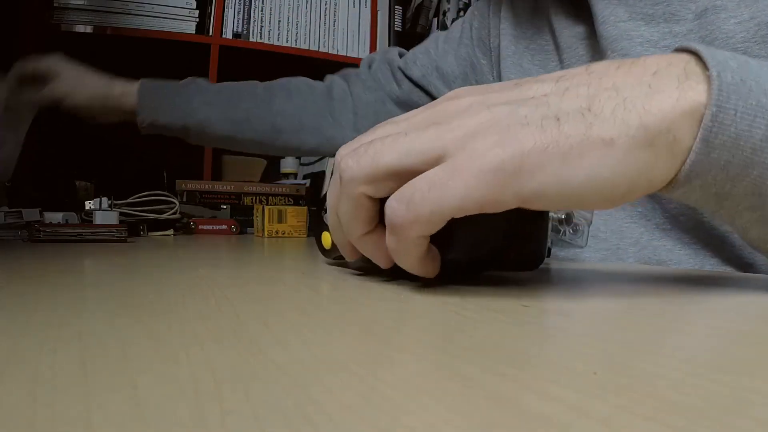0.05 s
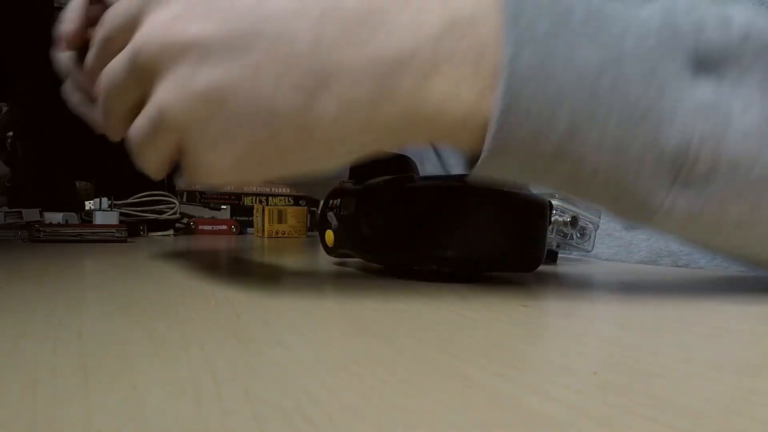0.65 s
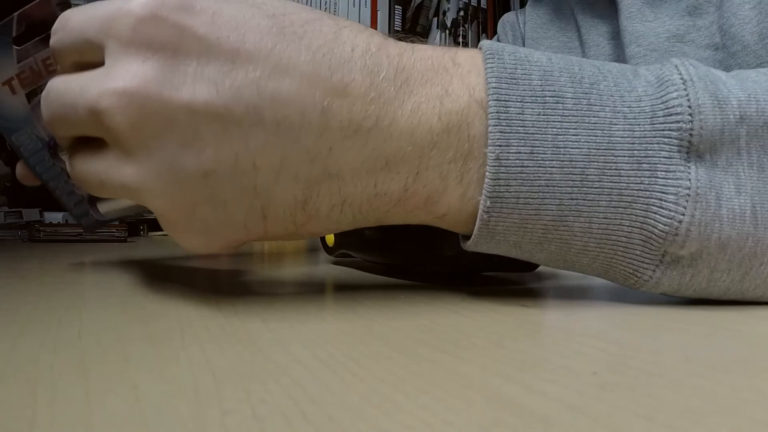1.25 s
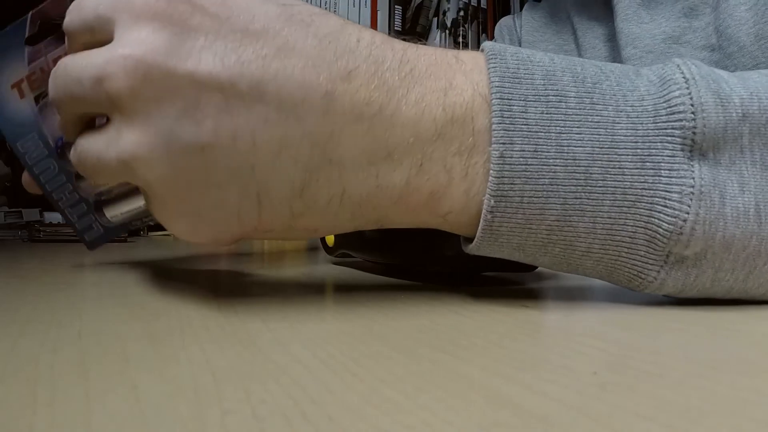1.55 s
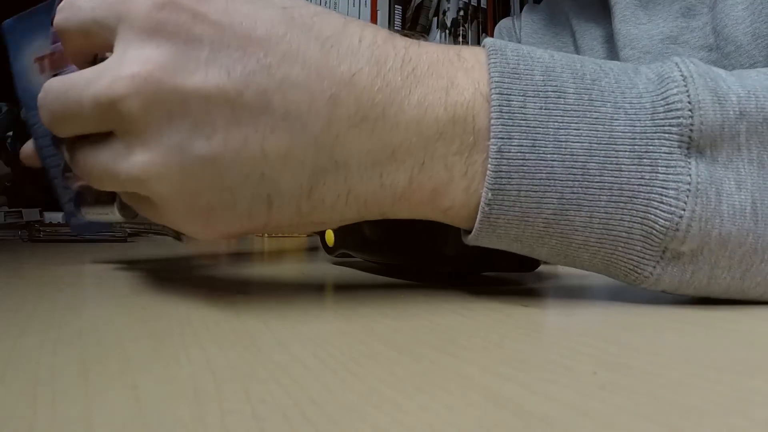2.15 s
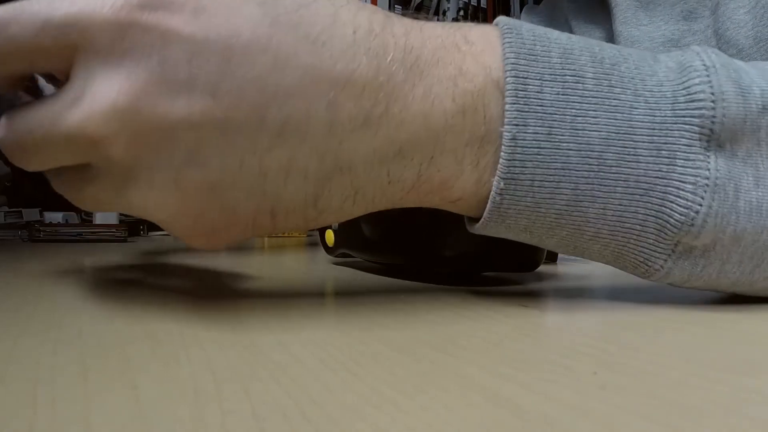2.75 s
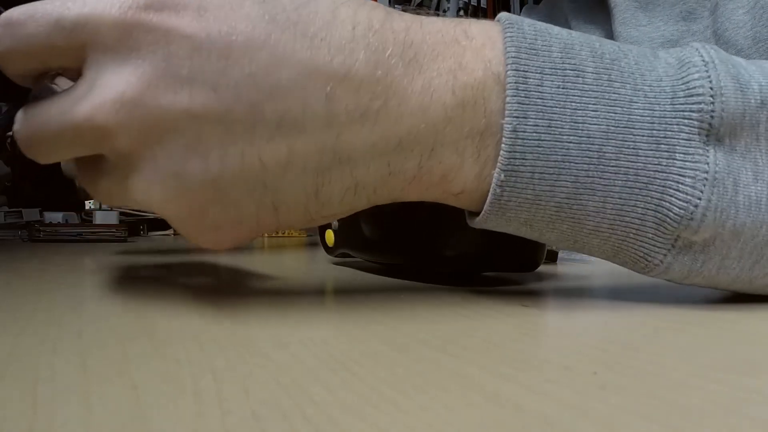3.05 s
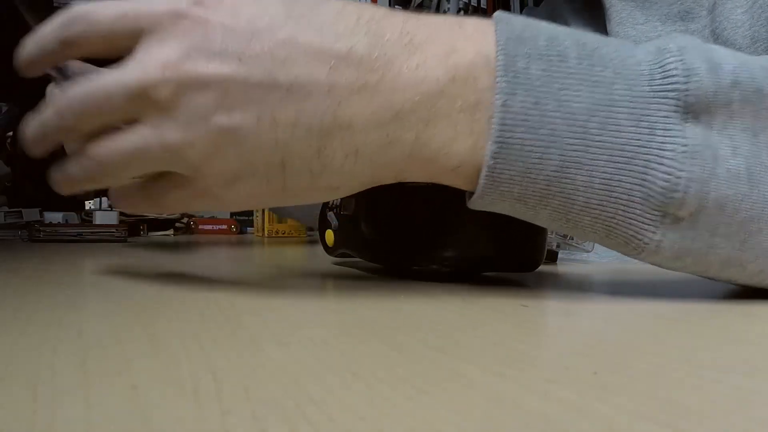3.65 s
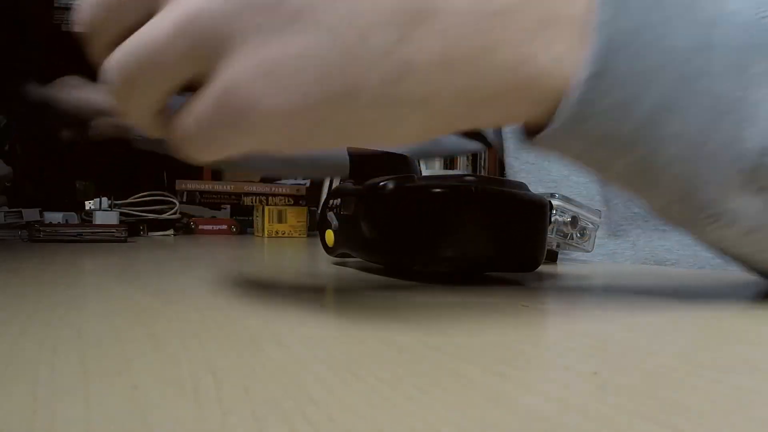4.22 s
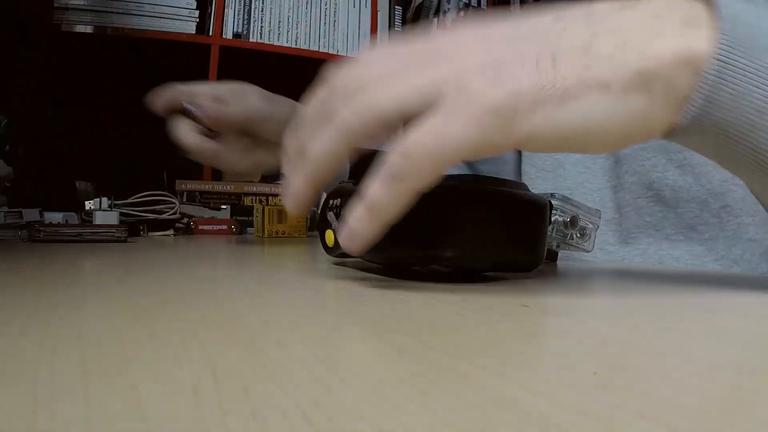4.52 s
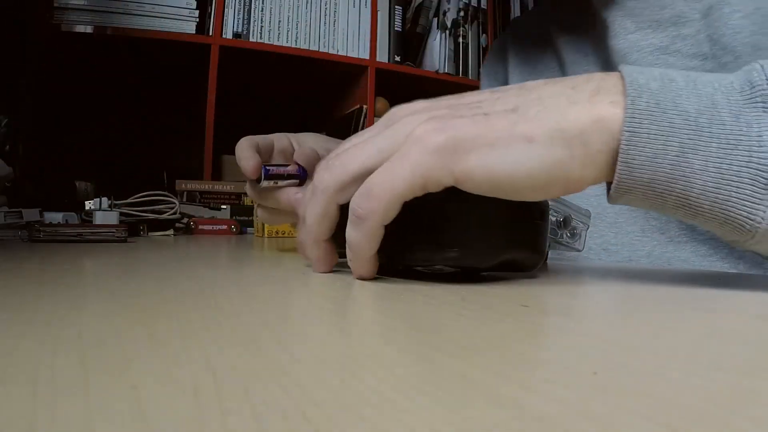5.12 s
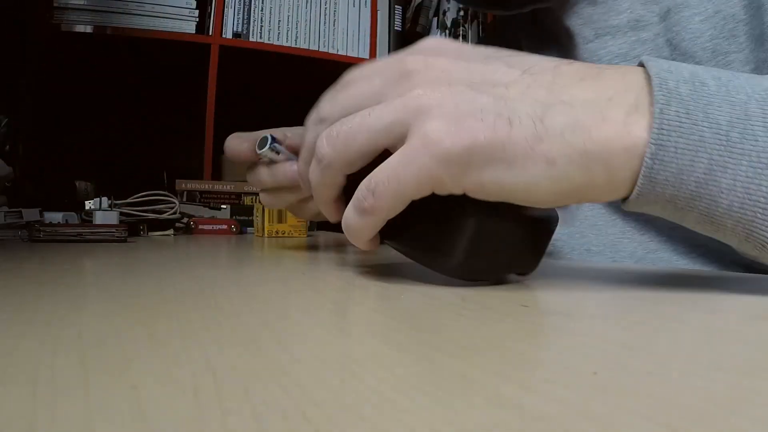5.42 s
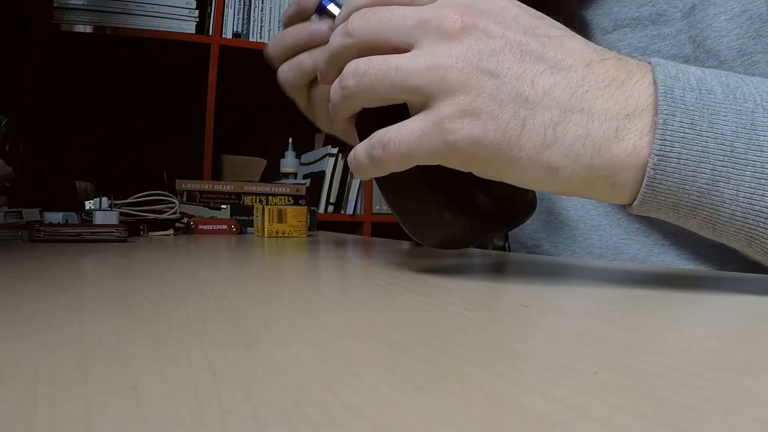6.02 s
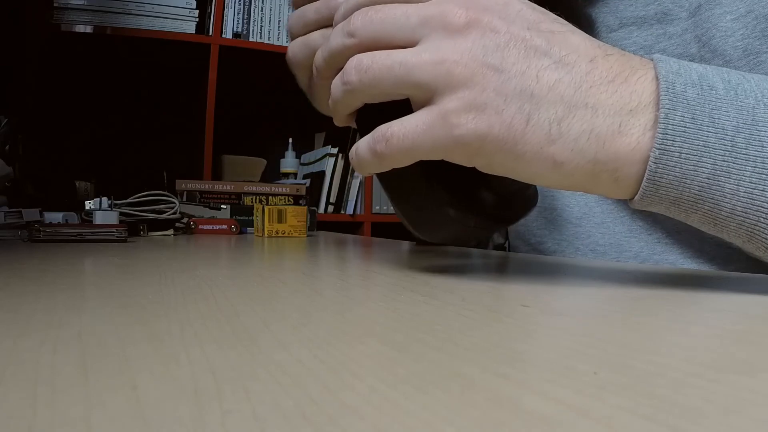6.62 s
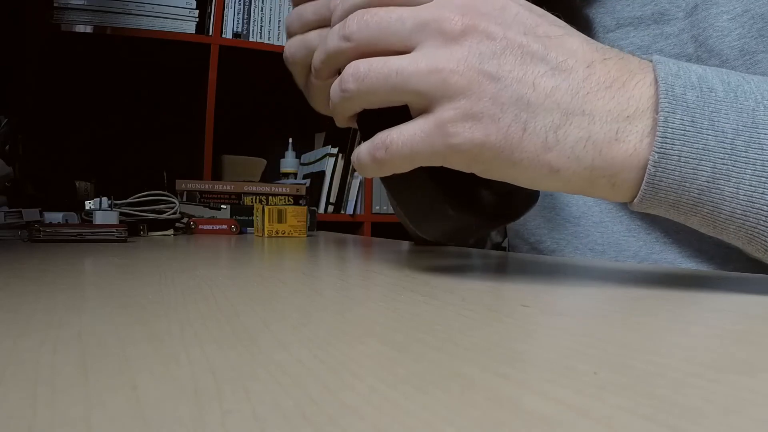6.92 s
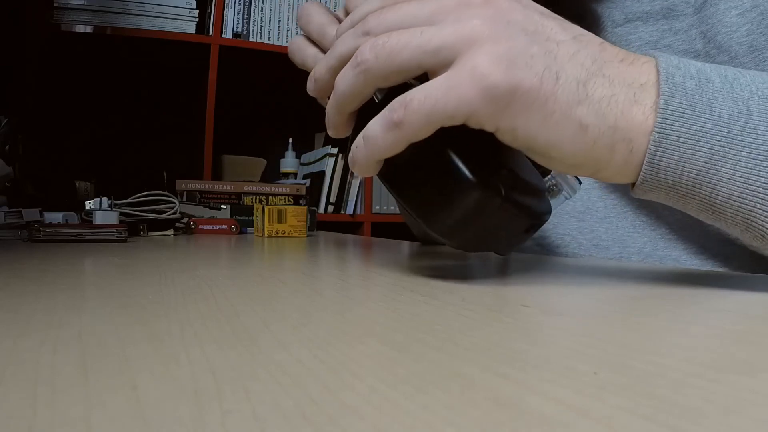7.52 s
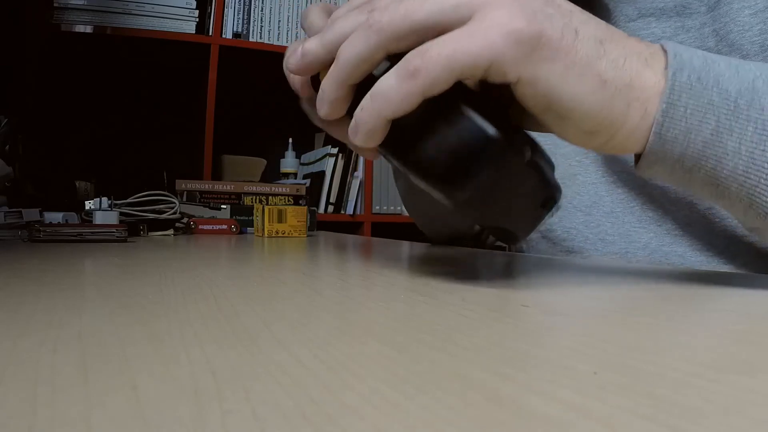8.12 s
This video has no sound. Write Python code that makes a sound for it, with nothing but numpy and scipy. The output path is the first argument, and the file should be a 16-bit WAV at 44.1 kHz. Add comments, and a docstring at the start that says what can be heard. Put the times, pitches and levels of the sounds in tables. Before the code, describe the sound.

A small film camera lands on a wooden desk with two dull knocks and a slight drag in the first 0.3 seconds. From about 0.5 to 3.4 seconds fingers softly rub a card carton, with scattered ticks and tearing snaps, the strongest at 1.6, and a short squeak at 2.1. At 3.4 a plastic canister lid pops sharply, the loudest sound, followed by faint finger rubs. At 4.2 tossed packaging lands in a quick, fairly loud clatter. The camera scrapes across the wood from 4.7 to 5.3, ending in a firm knock. After a quiet stretch and a faint slide near 7, the film cartridge clicks and rattles into the plastic chamber from 7.2 to 7.8, with soft low thuds from the desk and a last tiny tick at 8. Everything is close, with short small-room reverberation over a faint, steady rumble and hiss.

```python
"""A film camera knocks and drags on a wooden desk, close by, over the low rumble of a small room.
Fingers rub a film carton until the card snaps and tears; the canister lid pops, the packaging tumbles
aside, the camera is slid and tilted, and the cartridge clicks into its chamber. Each impact excites
the damped modes of the struck object, each rub is a train of tiny stick-slip pulses, and the room
answers both with a short reverberation."""
import sys
import numpy as np
from scipy import signal
from scipy.fft import rfft, irfft
from scipy.io import wavfile

SR = 44100
rng = np.random.default_rng(int(sys.argv[2]) if len(sys.argv) > 2 else 0)


def unload_wav(signal):
    """Save mono or channel-first audio to the path in sys.argv[1] as 16-bit WAV at rate SR, clipped to [-1, 1]."""
    wavfile.write(
        sys.argv[1],
        SR,
        np.round(np.clip(np.atleast_2d(signal).T, -1, 1) * 32767).astype(np.int16),
    )


N = 364266


def amp(db):
    """Amplitude ratio of a level in decibels."""
    return 10 ** (np.asarray(db) / 20)


def unit(x):
    """Normalisation to an energy of one."""
    return x / np.sqrt(np.sum(x ** 2))


def fade(t, t60):
    """Exponential damping, 60 dB down at t60."""
    return np.exp(-np.log(1000) * t / t60)


def add(track, start_s, x):
    """Superposition: x joins the track at start_s."""
    i = max(int(start_s * SR), 0)
    track[i:i + len(x)] += x[:N - i]


def colour(x, spectrum, size=4096):
    """Minimum-phase filtering to a spectrum of (frequency_hz, level_db) points."""
    hz, db = np.transpose(spectrum)
    bin_hz = np.maximum(np.arange(size // 2 + 1) * SR / size, 1)
    gain = amp(np.interp(np.log(bin_hz), np.log(hz), db))
    cepstrum = irfft(np.log(gain))
    cepstrum[1:size // 2] *= 2  # folding onto positive time makes the filter causal
    cepstrum[size // 2 + 1:] = 0
    return signal.fftconvolve(x, irfft(np.exp(rfft(cepstrum))))[:len(x)]


def band(x, hz, ratio):
    """Band-pass filtering from hz / ratio to hz * ratio."""
    edges = [hz / ratio, min(hz * ratio, SR / 2 - 1000)]
    return signal.sosfilt(signal.butter(2, edges, "band", fs=SR, output="sos"), x)


def impacts(events, modes, crack_spectrum, *, contact_s, focus_db, crack_t60, buzz_db, buzz_t60,
            part_db, part_t60, tilt_db, tilt_per_crack):
    """Modal ringing: a blow favours modes near its pitch, under a noisy crack and loose parts' buzz."""
    out, t = np.zeros(N), np.arange(SR // 6) / SR
    mode_hz, mode_db, t60 = np.transpose(modes)[:, :, None]
    polarity = (-1) ** np.arange(len(modes))[:, None]  # neighbouring modes start in opposite directions
    contact = 1 - np.exp(-(t / contact_s) ** 2)  # surfaces meet and scuff over a moment
    noise_envelope = contact * (fade(t, crack_t60) + amp(buzz_db) * fade(t, buzz_t60))
    for start_s, level_db, pitch_hz, crack_db in events:
        grip = 1 + 0.017 * rng.standard_normal(mode_hz.shape)  # the holding hand detunes the modes
        nearness = np.exp(-(np.log2(mode_hz / pitch_hz) / 0.5) ** 2)  # half an octave to either side
        weight = polarity * amp(mode_db + focus_db * nearness) / np.sqrt(t60)
        ring = np.sum(weight * fade(t, t60) * np.sin(2 * np.pi * mode_hz * grip * t), axis=0)
        db_per_octave = tilt_db + tilt_per_crack * crack_db  # harder contact is brighter
        spectrum = [(hz, db + db_per_octave * np.log2(hz / pitch_hz)) for hz, db in crack_spectrum]
        crack = colour(rng.standard_normal(len(t)) * noise_envelope, spectrum)
        struck_part = contact * fade(t, part_t60) * np.cos(2 * np.pi * pitch_hz * t)  # a flap or lever
        blow = unit(unit(ring) + amp(part_db) * unit(struck_part) + amp(crack_db) * unit(crack))
        add(out, start_s, amp(level_db) * np.sqrt(SR / 100) * blow)  # energy of level_db held for 10 ms
    return out


def friction(strokes, spectrum, slips_per_s, scatter_db, width_octaves):
    """Stick-slip friction: a swell of uneven pulses, heard as hiss and through one resonance."""
    out, longest = np.zeros(N), SR // 2
    for peak_s, half_length_s, level_db, pitch_hz, resonance_db in strokes:
        n = min(int(2 * half_length_s * SR), longest)
        chance, size = rng.random((2, longest))[:, :n]
        strength = rng.standard_normal(longest)[:n] * amp(scatter_db * size)
        slips = (chance < slips_per_s / SR) * strength
        swell = np.pad(slips * np.hanning(n), (0, SR // 20))
        hiss = unit(colour(swell, spectrum))
        resonance = amp(resonance_db) * unit(band(swell, pitch_hz, 2 ** (width_octaves / 2)))
        add(out, peak_s - half_length_s, amp(level_db) * np.sqrt(n / 3) * unit(hiss + resonance))
    return out


def rebounds(events, gap_s, drop_db, pitch_hz, crack_db):
    """Inelastic rebound: a weaker blow follows each impact after an uneven pause."""
    gaps = gap_s * np.exp(0.2 * rng.standard_normal(len(events)))
    return [(start_s + gap, level_db + drop_db, pitch_hz, crack_db)
            for (start_s, level_db, *_), gap in zip(events, gaps)]


# Background noise spectrum: frequency_hz, density_db
AMBIENT_SPECTRUM = [(12, -41.5), (20, 0.5), (76, -0.5), (108, -2.5), (286, -7), (319, -7), (357, -10),
                    (387, -9), (713, -14.5), (865, -14.5), (1270, -18), (1880, -20), (2160, -20.5),
                    (5240, -28.5), (15000, -44.5)]


def room_tone(level_db=-61.5):
    """Stationary noise: a low rumble under a soft hiss."""
    return amp(level_db) * np.sqrt(N) * unit(colour(rng.standard_normal(N), AMBIENT_SPECTRUM))


# Camera landings, rocking level relative to each: start_s, level_db, pitch_hz, crack_db, rock_db, rock_hz
LANDINGS = [(0.0113, -30.5, 161, -15, -3.5, 167), (0.187, -27.5, 130, -16, -10, 510),
            (2.296, -54.5, 123, -25, -16, 125), (5.3236, -29, 239, -13.5, -23, 161)]
# Modes of the camera on the desk: frequency_hz, energy_db, t60_s
LANDING_MODES = [(80, -4, 0.091), (112, -4.5, 0.03), (160.6, -0.5, 0.1), (279, 1, 0.048), (345, -0.5, 0.16),
                 (393, -1, 0.027), (510, 3.5, 0.011), (657, -1, 0.03), (820, -6, 0.028),
                 (1340, -9.5, 0.0053)]
# Their dense upper modes: frequency_hz, density_db
LANDING_CRACK = [(30, 6), (100, 12), (600, 0.5), (1600, -3), (2800, -6.5), (4200, -17.5), (7000, -32.5),
                 (15000, -59)]


def camera_knocks(rock_gap_s=0.0103, rock_crack_db=3.5):
    """Rocking of a rigid body: after each landing, two more feet strike the desk in turn."""
    events = []
    for start_s, level_db, pitch_hz, crack_db, rock_db, rock_hz in LANDINGS:
        events.append((start_s, level_db, pitch_hz, crack_db))
        for foot in (1, 2):
            events.append((start_s + foot * rock_gap_s, level_db + rock_db, rock_hz, rock_crack_db))
    return impacts(events, LANDING_MODES, LANDING_CRACK, contact_s=0.00073, focus_db=11.5,
                   crack_t60=0.014, buzz_db=-17, buzz_t60=0.09,
                   part_db=-17, part_t60=0.06, tilt_db=-0.9, tilt_per_crack=-0.078)


# Drags across the desk, and a finger bumping the camera at 4.688 s: peak_s, half_length_s, level_db, pitch_hz
SLIDES = [(.08, 0.044, -53, 450), (0.238, 0.032, -43.5, 407), (4.688, .022, -47, 556),
          (4.834, 0.077, -39.5, 303.5), (4.945, 0.037, -59, 234), (5.228, 0.053, -56, 310),
          (5.275, .045, -53.5, 186), (6.986, .06, -57, 314), (7.12, 0.064, -62.5, 213)]
# Friction spectrum of the wood: frequency_hz, density_db
SLIDE_SPECTRUM = [(40, -22), (150, 3), (350, 6), (600, 1.5), (900, -10.5), (1300, -9.5), (2000, -21.5),
                  (3000, -21), (6000, -39), (15000, -62)]


def camera_slides(resonance_db=-2):
    """Sliding friction: the camera catches and slips on the wood, driving a low resonance; once a finger bumps
    it."""
    strokes = [(*slide, resonance_db) for slide in SLIDES]
    return friction(strokes, SLIDE_SPECTRUM, slips_per_s=2000, scatter_db=-1, width_octaves=0.24)


# Finger strokes, and the lid scraping off the canister rim at 3.468 s; squeak relative to hiss: peak_s,
# half_length_s, level_db, squeak_db
STROKES = [(0.104, .04, -56, 2), (0.162, 0.044, -60.5, -6), (.52, 0.072, -68, -29), (1.027, 0.021, -55, -4),
           (1.12, 0.11, -63, -30), (1.218, 0.032, -56, -6), (1.557, 0.049, -54.5, -22),
           (1.685, .04, -53.5, -9), (1.798, 0.076, -60, -5), (2.012, 0.049, -54.5, -7),
           (2.096, 0.057, -46, 8.5), (2.143, .03, -53, -12), (2.273, 0.052, -59, -23),
           (2.423, 0.058, -52, -14), (2.542, 0.12, -57, -7), (2.649, 0.03, -59, 7),
           (2.907, 0.046, -62, -16), (3.36, .03, -55.5, -4), (3.425, .03, -54, -9.5),
           (3.468, .033, -41.5, -6.5), (3.625, .06, -59, -11), (3.767, 0.093, -66.5, -14.5),
           (3.914, 0.041, -62.5, -6), (4.028, 0.1, -65, -2)]
# Friction spectrum of the fingers: frequency_hz, density_db
STROKE_SPECTRUM = [(100, -13), (700, 3), (1400, 6.5), (2700, 3), (4000, -1.5), (6200, -9.5), (9000, -24),
                   (15000, -29)]


def rubs_and_lid_scrape(carton_hz=1330, canister_hz=2290):
    """Friction-driven resonance: the carton squeaks under the fingers or, after the pop, the canister, whose
    lid scrapes off its rim."""
    lid_s = LID_RELEASE[0][0]
    strokes = [(peak_s, half_length_s, level_db, carton_hz if peak_s < lid_s else canister_hz, squeak_db)
               for peak_s, half_length_s, level_db, squeak_db in STROKES]
    return friction(strokes, STROKE_SPECTRUM, slips_per_s=2900, scatter_db=6, width_octaves=0.5)


# Snaps of the card: start_s, level_db, pitch_hz, crack_db
SNAPS = [(0.328, -66, 2920, 8), (0.6792, -40.5, 940, 1.5), (.769, -53.5, 1620, 1), (1.014, -48.5, 1080, 3),
         (1.498, -53.5, 940, 1.5), (1.5597, -30, 850, -1), (1.5599, -32.5, 2200, 1.5),
         (1.623, -51, 3120, 13), (1.678, -47.5, 1330, 2.5), (1.802, -57, 1600, 2), (1.947, -59.5, 1480, 7),
         (2.003, -51, 1560, -7), (2.013, -54, 1710, 16), (2.124, -57, 1200, 9), (2.267, -58, 2500, 12),
         (2.293, -57, 1400, 11.5), (2.419, -48.5, 2780, 7), (2.461, -53.5, 1510, 5.5),
         (2.535, -45, 2416, 5.5), (2.541, -44.5, 2620, 3), (2.65, -59.5, 3770, 10.5), (2.77, -68, 3020, 15),
         (2.888, -61.5, 4360, -5), (3.304, -55.5, 510, 0), (3.359, -43, 1285, -2), (3.600, -53, 1950, 4.5),
         (4.007, -62.5, 2700, -6), (4.17, -59, 1000, 0)]
# Modes of the carton: frequency_hz, energy_db, t60_s
CARTON_MODES = [(360, -7.5, 0.052), (613, -8, 0.26), (660, -4.5, 0.029), (890, -3, 0.018),
                (1007, -5.5, 0.02), (1331, 0, 0.017), (1610, 0.5, 0.02), (1980, -1.5, 0.014),
                (2710, 1.5, .02), (3400, -13.5, 0.026), (4300, -22, 0.017), (6100, -18, 0.00934)]
# Its dense upper modes: frequency_hz, density_db
CARTON_CRACK = [(100, -13.5), (500, 1), (1400, -1.5), (2800, -2.5), (4200, -12.5), (6200, -21.5),
                (9000, -30), (15000, -49)]


def carton_tearing(crease_lead_s=0.006, crease_db=-10, crease_max_db=-54.5):
    """Sudden release of strain: creases, snaps and fibre ticks ring the carton's modes."""
    creases = [(start_s - crease_lead_s, min(level_db + crease_db, crease_max_db), pitch_hz, crack_db)
               for start_s, level_db, pitch_hz, crack_db in SNAPS
               if crack_db < 5]  # only full-bodied snaps are led by a crease
    return impacts(SNAPS + creases + fibre_ticks(), CARTON_MODES, CARTON_CRACK, contact_s=0.0011,
                   focus_db=11, crack_t60=0.02, buzz_db=-17.5, buzz_t60=0.076,
                   part_db=-3, part_t60=0.02, tilt_db=-1.5, tilt_per_crack=0.5)


def fibre_ticks(carton_held_s=0.45, ticks_per_s=22, scatter_db=2.5, pitch_hz=2000, crack_db=7.5):
    """Acoustic emission: stroked fibres tick, louder under a firm stroke, fainter when it squeaks."""
    events, lid_s = [], LID_RELEASE[0][0]
    for peak_s, half_length_s, level_db, squeak_db in STROKES:
        if carton_held_s < peak_s < lid_s:
            count = round(ticks_per_s * half_length_s)
            typical_db = level_db - max(squeak_db, 0) - 1.5
            for offset, strength in rng.standard_normal((6, 2))[:count]:
                tick_db = typical_db + scatter_db * (strength - offset ** 2)  # weaker far from the peak
                events.append((peak_s + offset * half_length_s / 2, tick_db, pitch_hz, crack_db))
    return events


# The two pulses of the lid's pop: start_s, level_db, pitch_hz, crack_db
LID_RELEASE = [(3.4455, -31, 2500, -3), (3.4473, -20, 1888, -5)]
# Modes of the canister: frequency_hz, energy_db, t60_s
CANISTER_MODES = [(399.7, -13.5, .03), (515, -8, .05), (613, -6, 0.1), (800, -15, 0.029), (1020, -15, .02),
                  (1350, -1, .016), (1800, 2, 0.012), (2030, 0, 0.00934), (2350, -3, .009),
                  (2890, -6.5, 0.0041), (3550, -10.5, 0.022)]
# Its dense upper modes: frequency_hz, density_db
CANISTER_CRACK = [(100, -9.5), (400, -7), (1000, -1), (2000, 2.5), (3300, 0), (4500, -9.5), (6500, -23),
                  (10000, -32), (15000, -41)]


def lid_pop():
    """Impulse excitation: the lid lets go in two quick pulses that ring the canister."""
    return impacts(LID_RELEASE, CANISTER_MODES, CANISTER_CRACK, contact_s=0.00033, focus_db=9,
                   crack_t60=0.01, buzz_db=-17.5, buzz_t60=0.1,
                   part_db=-18.5, part_t60=0.012, tilt_db=-0.7, tilt_per_crack=0.1)


# Booms of the desk top: start_s, level_db
THUDS = [(3.448, -61), (4.215, -48), (5.3245, -42), (7.397, -48.5), (7.578, -51), (7.684, -47)]


def desk_thuds(pitch_hz=82, t60_s=0.038):
    """Damped oscillation: the desk top's lowest mode booms under the heaviest handling."""
    out, t = np.zeros(N), np.arange(SR // 4) / SR
    thud = unit(fade(t, t60_s) * np.sin(2 * np.pi * pitch_hz * t))
    for start_s, level_db in THUDS:
        add(out, start_s, amp(level_db) * np.sqrt(SR / 100) * thud)
    return out


# Contacts of the tossed packaging: start_s, level_db, pitch_hz, crack_db
FALLS = [(4.209, -29.5, 906, 0), (4.2155, -28, 297, -5), (4.221, -26.5, 610, -3), (4.227, -30, 640, 4.5),
         (4.237, -38, 620, 3.5), (4.266, -44, 745, 7), (4.2791, -34.5, 766, 5.5), (4.307, -44.5, 794, 9)]
# Modes of the packaging: frequency_hz, energy_db, t60_s
PACKAGING_MODES = [(125, -0.5, 0.31), (152, -11, 0.075), (302, -9, 0.036), (419, -19, 0.036),
                   (529, 1.5, 0.082), (660, 5.5, 0.033), (727, -1.5, 0.048), (880, -2, 0.051),
                   (1286, -1, 0.033)]
# Its dense upper modes: frequency_hz, density_db
PACKAGING_CRACK = [(30, -15), (80, 10.5), (300, 6.5), (800, 4.5), (1400, 1), (2800, -4), (5000, -16),
                   (8000, -28.5), (15000, -43.5)]


def packaging_tumble():
    """Inelastic collision: each piece of packaging lands and bounces once, more weakly."""
    bounces = rebounds(FALLS, gap_s=0.011, drop_db=-13.5, pitch_hz=685, crack_db=4.5)
    return impacts(FALLS + bounces, PACKAGING_MODES, PACKAGING_CRACK, contact_s=0.0018, focus_db=3,
                   crack_t60=0.04, buzz_db=-16, buzz_t60=0.2,
                   part_db=-8, part_t60=0.041, tilt_db=0.52, tilt_per_crack=0.21)


# Contacts of cartridge and chamber: start_s, level_db, pitch_hz, crack_db
CLICKS = [(5.018, -62.5, 2720, -1), (5.237, -55, 2500, 5), (7.159, -52, 1850, 3), (7.2834, -39, 1066, -6.5),
          (7.3665, -34.5, 1060, -3), (7.3726, -35, 2760, -3), (7.3958, -35.5, 1370, 0.5),
          (7.404, -33, 1030, -5.5), (7.4076, -36, 970, -4), (7.577, -36, 673, -1.5), (7.678, -55, 1180, -1),
          (7.744, -51.5, 674, -8), (7.8063, -39, 1710, 1), (8.035, -64, 3040, 19)]
# Modes of the camera's plastic shell: frequency_hz, energy_db, t60_s
SHELL_MODES = [(418, -5.5, 0.12), (555, 2.5, 0.057), (647, -1, 0.026), (730, -4, 0.036), (1020, 3, 0.023),
               (1266, 3.5, 0.042), (1310, 1, 0.018), (1634, -1.5, 0.028), (2105, -1, 0.018),
               (2600, -11, 0.053), (2930, -12.5, 0.004), (3680, -14, 0.047), (4620, -28, 0.037),
               (7080, -17, 0.016)]
# Its dense upper modes: frequency_hz, density_db
SHELL_CRACK = [(100, -31.5), (500, 2), (1300, 1.5), (3000, -6.5), (4500, -13), (7200, -20.5),
               (10000, -32.5), (15000, -44)]


def cartridge_clicks():
    """Secondary impacts: each click rings the shell, a small part pings and the cartridge falls back."""
    pings = rebounds(CLICKS, gap_s=0.011, drop_db=-20.5, pitch_hz=3570, crack_db=3)
    rattles = rebounds(CLICKS, gap_s=0.024, drop_db=-18, pitch_hz=745, crack_db=-6.5)
    return impacts(CLICKS + pings + rattles, SHELL_MODES, SHELL_CRACK, contact_s=0.00063, focus_db=7,
                   crack_t60=0.018, buzz_db=-6, buzz_t60=0.068,
                   part_db=-4, part_t60=0.021, tilt_db=-0.04, tilt_per_crack=0.42)


# Reflections in octave bands: centre_hz, gain_db, t60_s
REFLECTION_BANDS = [(126, -10, .35), (245, 1, 0.44), (530.3, 4.5, .26), (990, 1, .26), (2000, -3.5, 0.44),
                    (4000, 1, 0.42), (8000, 5, 0.35), (14000, 1, .22)]
# Standing waves between desk, shelves and walls: frequency_hz, energy_db, t60_s
STANDING_WAVES = [(109, -24.5, .3), (159, -28.5, 0.1), (336, -33.5, 0.22), (556, -22.5, 0.15),
                  (635, -21.5, 0.084), (747, -30, .2), (1000.4, -26, 0.18)]


def reverberation(x, early_t60=0.083, early_db=1, build_s=0.0039):
    """Convolution with the room: early reflections, a short diffuse tail and a few standing waves."""
    t = np.arange(SR // 2) / SR
    onset = np.clip(t / build_s - 0.5, 0, 1)
    response = np.zeros(len(t))
    for hz, db, t60 in REFLECTION_BANDS:
        envelope = onset * (fade(t, t60) + amp(early_db) * fade(t, early_t60))
        response += amp(db) * band(rng.standard_normal(len(t)) * unit(envelope), hz, np.sqrt(2))
    for hz, db, t60 in STANDING_WAVES:
        response += amp(db) * unit(onset * fade(t, t60) * np.cos(2 * np.pi * hz * t))
    return signal.fftconvolve(x, response)[:N]


def scene():
    """Direct and reverberant fields: sources further from the microphone carry more of the room."""
    knocks, lid, clicks, tumble = camera_knocks(), lid_pop(), cartridge_clicks(), packaging_tumble()
    fingers, slides, carton = rubs_and_lid_scrape(), camera_slides(), carton_tearing()
    direct = knocks + slides + fingers + carton + lid + desk_thuds() + tumble + clicks
    from_desk = amp(-10) * (knocks + slides) + amp(-15) * clicks
    from_hands = amp(-13) * fingers + amp(-13.5) * carton + amp(-14.5) * lid
    reflected = reverberation(from_desk + from_hands + amp(-6.5) * tumble)
    return (direct + reflected + room_tone())[None]


def record(dry, rumble_hz=22, top_hz=15300):
    """Band limiting: the microphone sheds the deepest rumble and the recorder cuts the top steeply."""
    high_pass = signal.butter(2, rumble_hz, "high", fs=SR, output="sos")
    low_pass = signal.ellip(8, 0.2, 70, top_hz, fs=SR, output="sos")
    return signal.sosfilt(low_pass, signal.sosfilt(high_pass, dry))


dry = scene()
out = record(dry)
unload_wav(out)
```